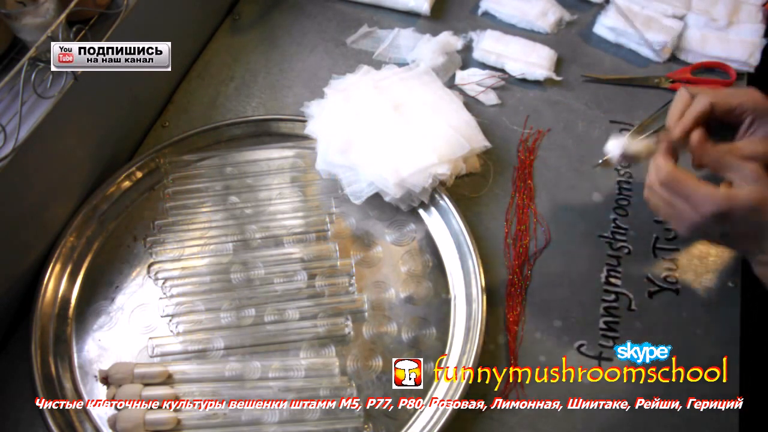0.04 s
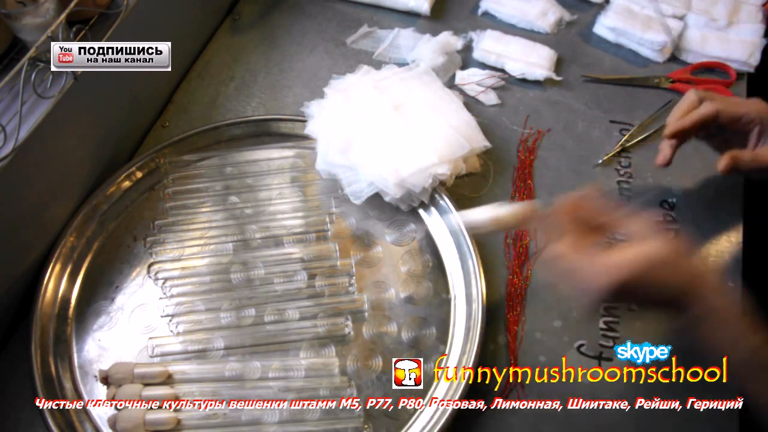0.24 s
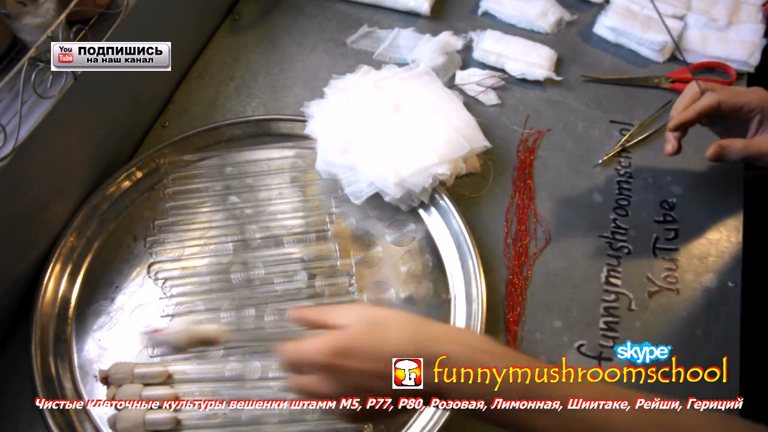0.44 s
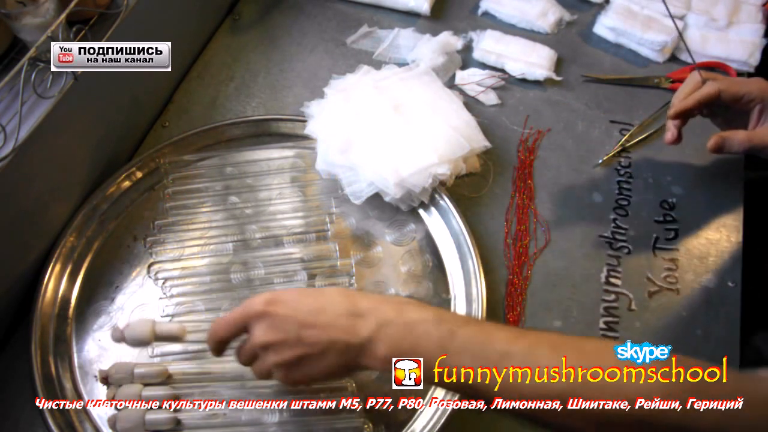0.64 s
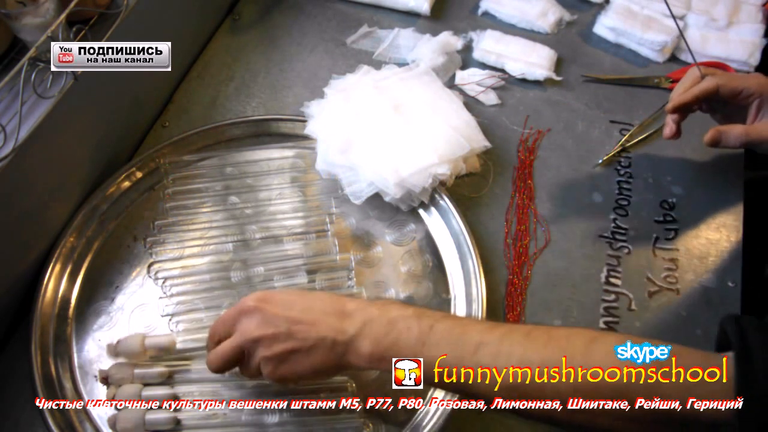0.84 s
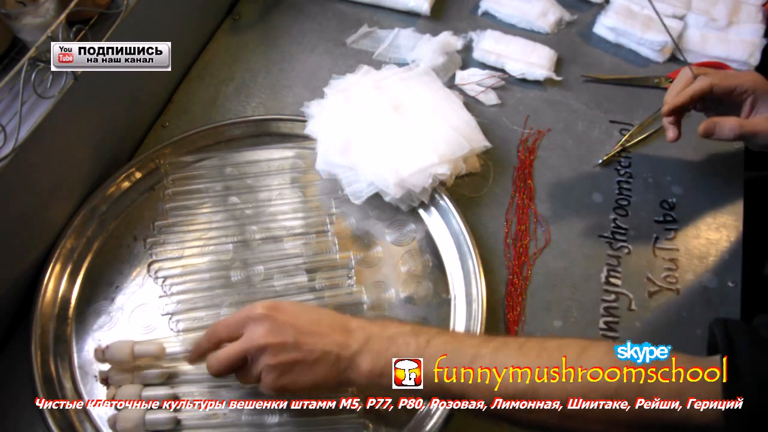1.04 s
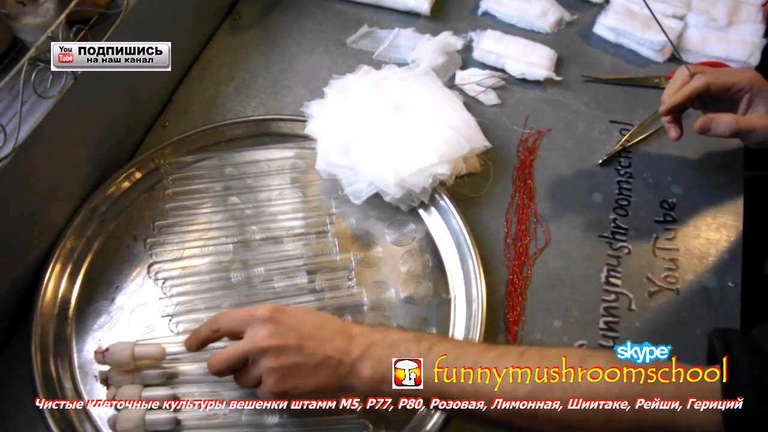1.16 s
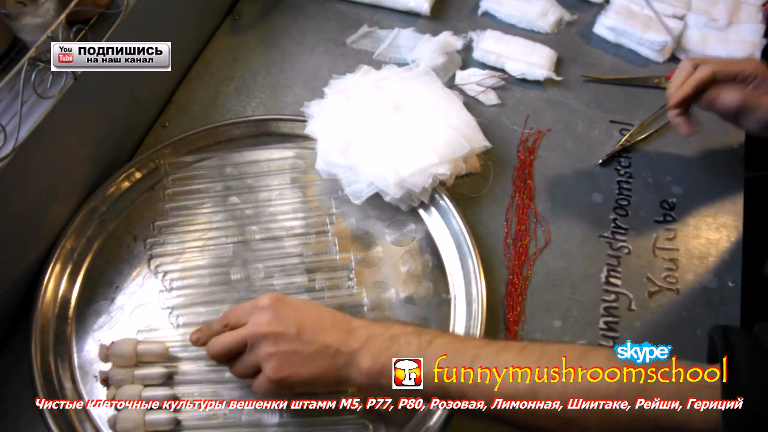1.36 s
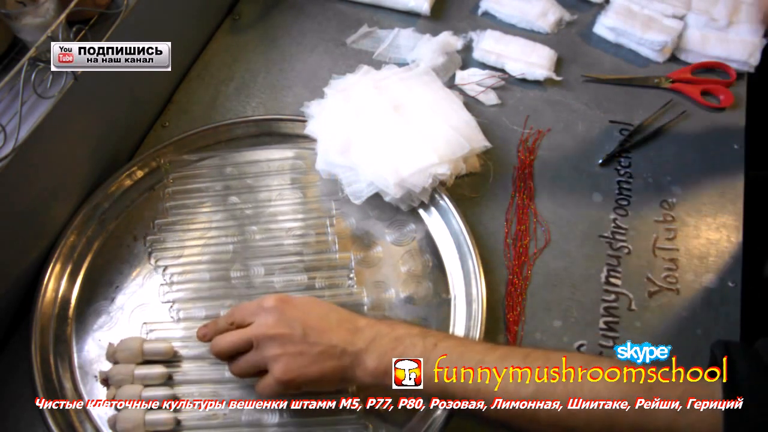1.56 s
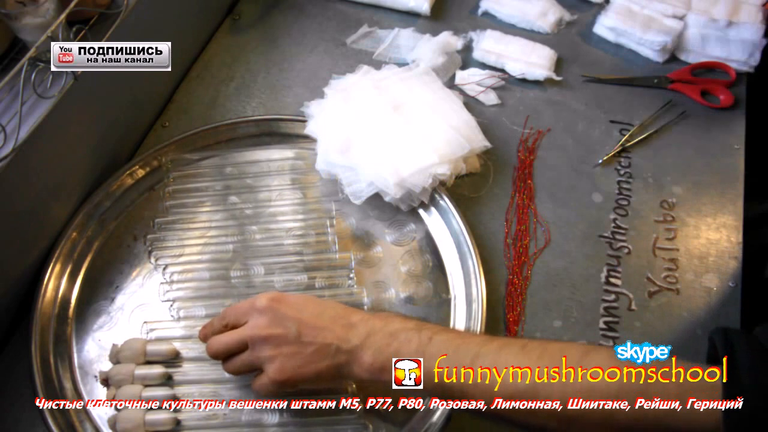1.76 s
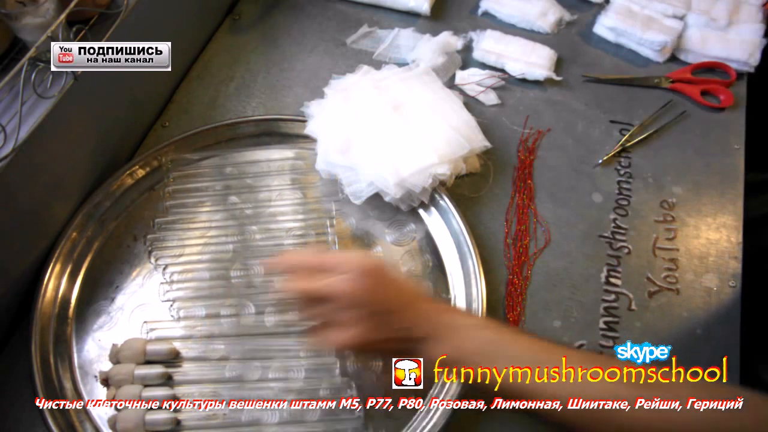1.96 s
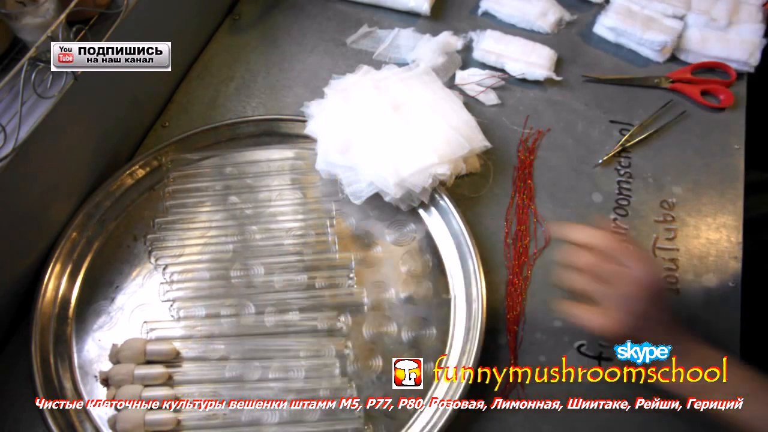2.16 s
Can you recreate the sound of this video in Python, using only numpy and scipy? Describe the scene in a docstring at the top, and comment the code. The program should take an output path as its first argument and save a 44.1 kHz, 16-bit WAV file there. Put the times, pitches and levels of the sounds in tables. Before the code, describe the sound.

Bright, hard clinks of thin glass tubes laid among others on a metal tray, with light rattling between the loud knocks and a quiet ending; soft rustle beneath, short room echoes, close stereo camera microphone slightly overloaded.

```python
"""A hand lays a glass test tube among others on a metal tray, over a soft rustle that plays throughout.
Two faint knocks come first, a loud one at 0.64 s, then a run of knocks with short sine tones as the tubes slide.
Loud knocks at 1.05 and 1.41 s carry a low thump, stronger on the right; after one more at 1.65 s come faint
tones and a faint knock. Each knock is a chatter of contacts on damped modes, a weak free ring and the echoes of
a small hard room. A close camera microphone hears it: its right capsule peaks near 4 kHz and the loudest
knocks overload it."""
import sys
import numpy as np
from scipy import signal
from scipy.fft import rfft, irfft
from scipy.io import wavfile
from scipy.ndimage import uniform_filter1d

SR = 44100
rng = np.random.default_rng(int(sys.argv[2]) if len(sys.argv) > 2 else 0)


def bounce(signal):
    """Save signal as a 16-bit WAV file at the path given by the first command-line argument."""
    frames = np.transpose(np.atleast_2d(signal))
    limited = np.clip(frames, -1, 1)
    pcm = np.round(limited * 32767).astype(np.int16)
    wavfile.write(sys.argv[1], SR, pcm)


N = 97725


def undb(db):
    """Decibel law: an amplitude ratio from a level."""
    return 10 ** (np.asarray(db) / 20)


def rms(x):
    """Effective level: the root of the mean square."""
    return np.sqrt(np.mean(x ** 2))


def unit(x):
    """Normalisation: scale to an rms of one."""
    return x / rms(x)


def band(x, hz, octaves):
    """Band-pass filtering: keep a band this many octaves wide round hz."""
    edges = [hz * 2 ** (-octaves / 2), hz * 2 ** (octaves / 2)]
    edges = np.clip(edges, 10, 0.45 * SR)
    return signal.sosfilt(signal.butter(2, edges, "band", fs=SR, output="sos"), x)


def alike(size, likeness):
    """Interchannel correlation: shared noise, plus noise of opposite sign left and right."""
    mid, side = rng.standard_normal((2, size))
    opposite = np.array([[1], [-1]])
    return np.sqrt((1 + likeness) / 2) * mid + np.sqrt((1 - likeness) / 2) * side * opposite


def walk(rate):
    """Slow random modulation: values drawn at this rate in Hz, smoothed twice, rms one."""
    hold = int(SR / rate)
    steps = np.repeat(rng.standard_normal(N // hold + 1), hold)
    smooth = uniform_filter1d(uniform_filter1d(steps, hold), hold)
    return unit(smooth[:N])


def causal(power):
    """Minimum phase: the most compact causal response with this power spectrum, by cepstral folding."""
    cepstrum = irfft(np.log(power) / 2)
    half = len(cepstrum) // 2
    cepstrum[1:half] *= 2
    cepstrum[half + 1:] = 0
    return irfft(np.exp(rfft(cepstrum)))


# Spectrum of the rustle. Each row: frequency in Hz, relative density in dB per Hz.
RUSTLE_SPECTRUM = [(30, -25.5), (100, -11), (300, -7), (1000, -7.5), (2000, -10.5), (4200, -10.5),
                   (6500, -16), (8200, -12), (11000, -20), (15000, -26)]
# Slow swell of the rustle. Each row: time in seconds, bass offset in dB, treble offset in dB.
RUSTLE_SWELL = [(0.0, -58.5, -63.5), (0.47, -65.5, -69), (0.69, -67, -76), (0.81, -51, -45.5),
                (1.04, -51.5, -55), (1.19, -51.5, -53.5), (1.33, -54.5, -48.5), (1.46, -58.5, -47.5),
                (1.57, -59.5, -57.5), (1.75, -55, -57), (2.03, -51.5, -55), (2.21, -52, -54)]
RUSTLE_DB, RUSTLE_SPLIT_HZ = -33.5, 1100  # common offset; border of bass and treble
FLICKER_DB, FLICKER_RATE_HZ = 2, 12.23
ALIKE_HZ = 463  # sets how fast left-right likeness falls with frequency


def background():
    """Band-filtered noise: half-octave bands of rustle flicker independently; the bass is alike left and right."""
    t, out = np.arange(N) / SR, 0
    s, bass_db, treble_db = np.array(RUSTLE_SWELL).T
    spectrum_hz, density_db = np.array(RUSTLE_SPECTRUM).T
    for hz in 35 * 2 ** np.arange(0, 9, 0.5):
        swell_db = np.interp(t, s, bass_db if hz < RUSTLE_SPLIT_HZ else treble_db)
        band_db = np.interp(np.log(hz), np.log(spectrum_hz), density_db) + 10 * np.log10(hz)
        flicker_db = FLICKER_DB * walk(FLICKER_RATE_HZ)
        noise = unit(band(alike(N, np.exp(-hz / ALIKE_HZ / 2)), hz, 0.48))
        out = out + undb(band_db + RUSTLE_DB + swell_db + flicker_db) * noise
    return out


# Faint short tones as the tubes slide. Each row: start in seconds, length in seconds up to the end
# of the full level, mean pitch in Hz, rms level in dB before the flutter.
SLIDE_TONES = [(0.809, 0.016, 1330, -48), (0.839, 0.014, 1310, -50), (1.825, 0.127, 1708, -62),
               (1.958, 0.035, 4100, -63)]
WAVER, WAVER_RATE_HZ = 0.025, 60  # fraction of the pitch
FLUTTER_DB, FLUTTER_RATE_HZ, EDGE_S = 4.0, 48.6, 0.004


def tones():
    """Frequency and amplitude modulation: short sines with random waver, flutter and soft edges."""
    t, out = np.arange(N) / SR, 0
    for s, length, hz, db in SLIDE_TONES:
        edge = np.clip(np.minimum(t - s, s + length + EDGE_S - t) / EDGE_S, 0, 1)
        pitch = hz * (1 + WAVER * walk(WAVER_RATE_HZ))
        sine = np.sqrt(2) * np.sin(2 * np.pi * np.cumsum(pitch) / SR)
        out = out + undb(db + FLUTTER_DB * walk(FLUTTER_RATE_HZ)) * edge * sine
    return out


# Low thumps under two loud knocks, stronger on the right. Each row: centre in seconds, peak in dB
# reaching the right capsule.
THUMP_ROWS = [(1.049, -36), (1.407, -34.5)]
THUMP_S, THUMP_LEFT_DB = 0.0012, -8  # Gaussian half-width at 1/e; left relative to right


def thumps():
    """Gaussian pulses: short low thumps of one polarity, stronger on the right."""
    t = np.arange(N) / SR
    pulses = sum(-undb(db) * np.exp(-((t - s) / THUMP_S) ** 2) for s, db in THUMP_ROWS)
    return pulses * undb([[THUMP_LEFT_DB], [0]])


# Reverberation of a small hard room. Each row: band centre in Hz, decay time t60 in seconds,
# relative density in dB per Hz, left-right likeness from 0 to 1.
ROOM_BANDS = [(340, 0.42, 9, 0.75), (724, 0.34, -0.5, 0.5), (1456, 0.27, -0.5, 0.28), (2760, 0.4, -1.5, 0),
              (4730, 0.31, 0, 0.07), (8500, .3, 3, 0.55), (13000, 0.073, 11, 0.4)]
ROOM_DELAY_S = 0.0028


def echoes():
    """Diffuse reverberation: dense noise echoes decay exponentially, band by band."""
    t, tail = np.arange(SR // 2) / SR, 0
    for hz, t60, db, likeness in ROOM_BANDS:
        decay = undb(db - 60 * t / t60) * (t > ROOM_DELAY_S)
        noise = unit(band(alike(len(t), likeness), hz, 0.97))
        tail = tail + decay * noise * np.sqrt(hz)  # wider bands hold more power
    return tail


def favour(modes, centre_hz, spread_oct):
    """Selective excitation: gain in dB falls off with the distance in octaves from a centre."""
    octaves = np.log2(np.array(modes)[:, 0] / centre_hz)
    return np.maximum(-6 * (octaves / spread_oct) ** 2, OFF_PITCH_DB)


# Modes of tray, tubes and treble. Each row: frequency in Hz, relative gain in dB, decay time t60 of
# the free ring in seconds.
TRAY = [(388, -4.5, 0.68), (740, 3, 0.052), (1165, 7, 0.067), (1321, 3, 0.22), (1583, 2, 0.38),
        (1758, 0, 0.34), (1878, 2.5, 0.14), (2145, 2, 0.22), (2448, 7.5, 0.15), (2880, 7, 0.067)]
TUBE = [(3062, 11, 0.16), (3005, -7, 0.66), (3315, 11, 0.23), (3590, -1, 0.63), (3757, 6.5, 0.32),
        (4240, -18, 0.52), (4150, 2.5, 0.56), (4198, 13.5, 0.2), (4280, 2, 0.16), (4386, 9, 0.14),
        (4750, 15.5, 0.13), (5520, 12.5, 0.083), (6204, 8.5, 0.11), (6720, 2.5, 0.098)]
TREBLE = [(7200, 12, 0.1), (8400, 6.5, 0.36), (8100, 12, 0.42), (8600, 5.5, 0.36), (8840, 10.5, 0.13),
          (10100, -14.5, 0.75), (9820, 7.5, .35), (10390, 7, 0.14), (11390, 5.5, 0.15), (12700, -23, 0.3),
          (12860, 6, 0.22), (13700, 0, .12)]
TRAY_SPREAD_OCT, MID_SPREAD_OCT, TREBLE_SPREAD_OCT, OFF_PITCH_DB = 0.37, 0.25, 0.37, -8.5
PRESSED_WIDTH_HZ, BASS_CUT_HZ = 220, 630
CRACK_DB, CRACK_HZ = -23, 7050  # broad floor under the pressed modes, and its upper corner
TUBES, DETUNE, SCATTER_DB = 3, 0.00515, 4.5  # copies of each mode, their spread in pitch (fraction) and gain
CONTACTS_PER_S, CONTACT_SCATTER_DB = 2200, 3.0
RISE_S, STOP_T60_S = 0.00052, 0.0095


def pressed_response(hz, gain_db, treble_db):
    """Contact damping: pressed modes widen into broad resonances with a crack beneath."""
    f = np.fft.rfftfreq(4096, 1 / SR)
    shapes = 1 / (1 + ((f[:, None] - hz) / PRESSED_WIDTH_HZ) ** 2) ** 2
    peaks = (undb(gain_db) ** 2 * shapes).sum(axis=1)
    crack = undb(CRACK_DB + treble_db) ** 2 / (1 + (f / CRACK_HZ) ** 4)
    bass_cut = f ** 4 / (f ** 4 + BASS_CUT_HZ ** 4) + 1e-5
    return causal((peaks + crack) * bass_cut)[:2048]


def free_ring(hz, gain_db, t60, size):
    """Modal superposition: detuned copies of each mode for several tubes decay exponentially."""
    hz, gain_db, t60 = (np.repeat(v, TUBES) for v in (hz, gain_db, t60))
    detune, scatter, sign = rng.standard_normal((3, len(hz)))
    pole = (2j * np.pi * hz * (1 + DETUNE * detune) - np.log(1000) / t60) / SR
    amplitude = undb(gain_db + SCATTER_DB * scatter) * np.sign(sign)
    # exp(pole * n) as block starts times steps within a block of 128 samples
    starts = amplitude[:, None] * np.exp(np.outer(pole, 128 * np.arange(size // 128 + 1)))
    steps = np.exp(np.outer(pole, np.arange(128)))
    return (starts.T @ steps).imag.ravel()[:size]


def chatter(length_s):
    """Repeated impact: jittered impulses of random sign and strength, the first at once."""
    count = min(max(int(length_s * CONTACTS_PER_S), 1), 64)
    jitter, sign, strength = rng.standard_normal((3, count))
    order = np.arange(count)
    when = (order + np.abs(np.tanh(jitter)) * (order > 0)) / CONTACTS_PER_S
    contacts = np.zeros(SR // 20)
    np.add.at(contacts, (when * SR).astype(int), np.sign(sign) * undb(CONTACT_SCATTER_DB * strength))
    return contacts


def knock(room, db, length_s, echo_db, ring_db, tray_db, tray_hz, mid_hz, treble_db, treble_hz):
    """Source and resonator: chatter drives pressed modes and stops short; free ring and echoes go on."""
    t = np.arange(SR // 2) / SR
    hz, gain_db, t60 = np.concatenate([TRAY, TUBE, TREBLE]).T
    gain_db = gain_db + np.concatenate([
        tray_db + favour(TRAY, tray_hz, TRAY_SPREAD_OCT),
        favour(TUBE, mid_hz, MID_SPREAD_OCT),
        treble_db + favour(TREBLE, treble_hz, TREBLE_SPREAD_OCT)])
    pressed = pressed_response(hz, gain_db, treble_db)
    ring = free_ring(hz, gain_db, t60, len(t))
    hit = signal.fftconvolve(pressed, chatter(length_s))
    hit = np.pad(hit, (0, len(t)))[:len(t)]
    stop_db = -60 * np.maximum(t - length_s, 0) / STOP_T60_S
    hit = hit * np.minimum(t / RISE_S, 1) * undb(stop_db)
    echo = signal.fftconvolve(pressed[None], room, axes=1)[:, :len(t)]
    early = int(length_s * SR) + 40
    later = slice(early, early + SR // 20)  # 50 ms that set the levels of ring and echo
    ring = undb(ring_db) * ring / rms(ring[later])
    echo = undb(echo_db) * echo / rms(echo[:, later])
    return undb(db - 8) * (hit / rms(hit[:early]) + ring + echo)  # peak taken as 8 dB over rms


# The knocks. Each row: start in seconds, nominal chatter peak in dB (8 dB above its rms), chatter length
# in seconds, echo in dB and free ring in dB (rms just after the chatter, relative to the chatter's rms),
# tray gain in dB, favoured tray pitch in Hz, favoured tube pitch in Hz, treble gain in dB, favoured
# treble pitch in Hz.
KNOCK_ROWS = [(0.038, -47.5, 0.002, -14, -16.5, 5, 2200, 3770, -0.5, 8000),
              (0.109, -52.5, 0.0078, -18, -28, -11, 1570, 3300, -3, 8060),
              (.6410, -4, 0.0065, -23.5, -31, -15, 1220, 3680, -10, 7900),
              (0.6435, -6.5, 0.0047, -15, -26, -0.5, 1470, 3580, -4.5, 8200),
              (0.7054, -14, 0.002, -12.5, -17, -6.5, 2140, 3840, -10, 8900),
              (.712, -36, .003, -19, -29, -6, 2150, 3880, 6, 8860),
              (0.733, -38, 0.0066, -1.5, -9, -13, 2160, 4050, -3, 8600),
              (0.816, -38.5, 0.017, -8.5, -15, 4, 895, 3390, 4, 8200),
              (0.851, -28, 0.00085, -31, -13, -10, 2400, 3280, -16, 8260),
              (0.8654, -31.5, 0.0011, -11, -8.5, -1.5, 2380, 3150, -27, 8200),
              (.899, -33, 0.0041, -4.5, -37, 2.5, 1870, 3000, -20, 8200),
              (0.903, -28, 0.0058, -34, -15, -21, 2100, 3140, -24, 8260),
              (0.915, -40.5, 0.0057, 1.5, -28, -31, 2100, 3150, -4, 8450),
              (0.93, -18.5, 0.0077, -11.5, -32, -3, 2020, 4420, -7, 9100),
              (0.943, -29, 0.0017, -36, -15, -11, 2000, 4400, -3, 8500),
              (1.0164, -35.5, 0.0036, -15, -18, -3, 2000, 4030, 9, 8400),
              (1.045, -4.5, 0.00276, -14, -23.5, 12, 1660, 3140, -4.5, 9100),
              (1.049, -11.5, 0.004, -8, -23.5, 4.5, 1480, 4120, -11.5, 8600),
              (1.142, -23.5, 0.0013, -10.5, -25, 5, 2100, 2970, -6, 8400),
              (1.1752, -23.5, 0.015, -13, -12.5, -1, 1490, 3760, -6.5, 8300),
              (1.2524, -36, 0.0086, -7, -31, -3, 2000, 3800, -7, 8400),
              (1.3536, -37, 0.012, -33, -16, 4, 1880, 3730, -16, 8700),
              (1.384, -41, 0.0088, -4, -23, -23, 2160, 3840, -12, 8400),
              (1.4072, -3.5, 0.00117, -12, -21, -2.5, 2310, 3525, -4, 9900),
              (1.4108, -14, 0.0042, -14, -4.5, -32, 2540, 3300, -1.5, 8000),
              (1.649, -5.5, 0.0017, -16, -29, -6.5, 1850, 4320, -4.5, 8900),
              (1.652, -10, 0.0066, -17, -21, -13, 2100, 2820, -4, 9000),
              (1.972, -54, 0.027, -1.5, -3, 7, 1600, 4340, -40, 8200)]


def glass():
    """Superposition: all knocks are added in turn, each with its echoes in the same room."""
    out, room = np.zeros((2, N + SR)), echoes()
    for s, *row in KNOCK_ROWS:
        sound = knock(room, *row)
        start = int(s * SR)
        out[:, start:start + sound.shape[1]] += sound
    return out[:, :N]


def scene():
    """Linear superposition of the rustle, the tones, the thumps and the knocks."""
    return background() + tones() + thumps() + glass()


RIGHT_HZ, RIGHT_Q, RIGHT_TOP_HZ = 4110, 2.74, 6940  # resonance, its sharpness, treble corner
RIGHT_DB, RIGHT_LAG_S = 2, 0.00001
HISS_DB, HISS_TILT = -65, 0.67  # rms before the top is cut; one-pole feedback that darkens the hiss
CEILING, TOP_HZ = 0.99, 15000


def record(dry):
    """Transducer resonance and overload: the right capsule peaks, the preamp hisses and clips, the top is cut."""
    f = np.fft.rfftfreq(2 * N, 1 / SR)
    lag = np.exp(-2j * np.pi * f * RIGHT_LAG_S)
    resonance = 1 / (1 - (f / RIGHT_HZ) ** 2 + 1j * f / RIGHT_HZ / RIGHT_Q)
    treble_loss = 1 / (1 + 1j * f / RIGHT_TOP_HZ)
    capsule = undb(RIGHT_DB) * lag * resonance * treble_loss
    right = irfft(rfft(dry[1], 2 * N) * capsule, 2 * N)[:N]
    hiss = signal.lfilter([1], [1, -HISS_TILT], rng.standard_normal((2, N)))
    x = np.array([dry[0], right]) + undb(HISS_DB) * unit(hiss)
    x = np.clip(x, -CEILING, CEILING)
    return signal.sosfilt(signal.ellip(10, 0.2, 60, TOP_HZ, fs=SR, output="sos"), x)


dry = scene()
out = record(dry)
bounce(out)
```